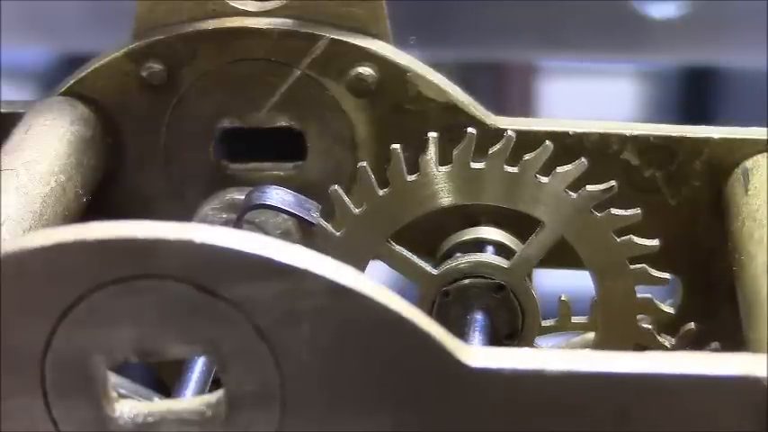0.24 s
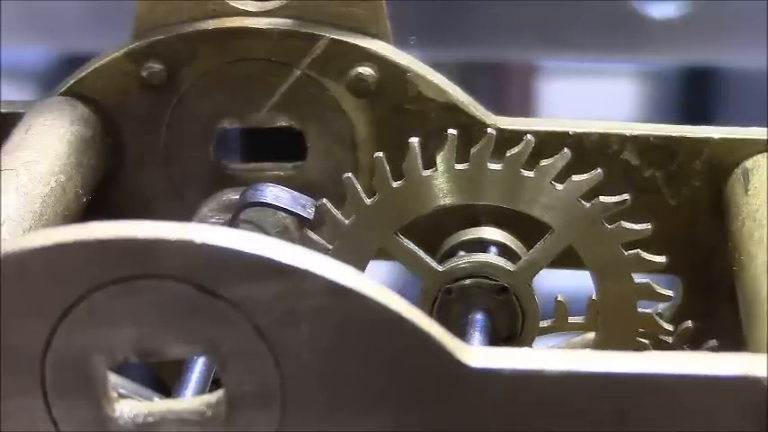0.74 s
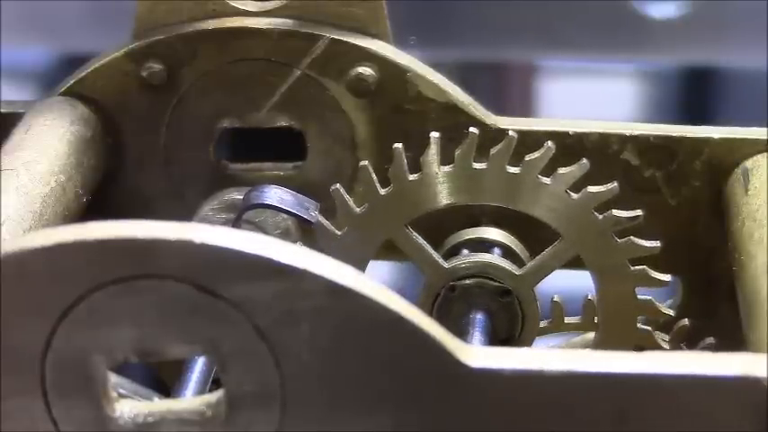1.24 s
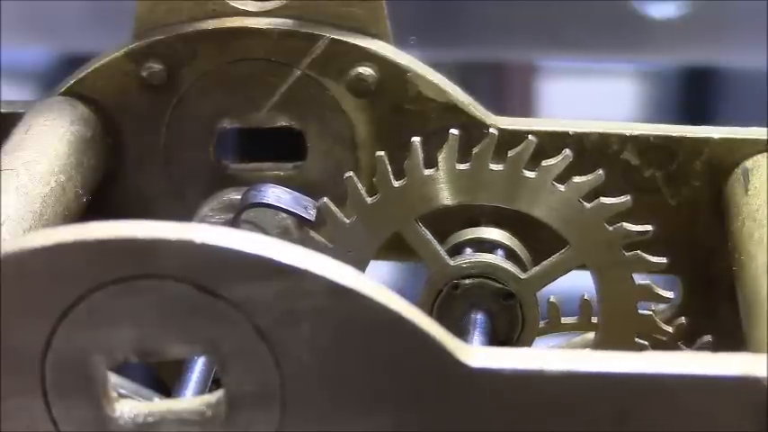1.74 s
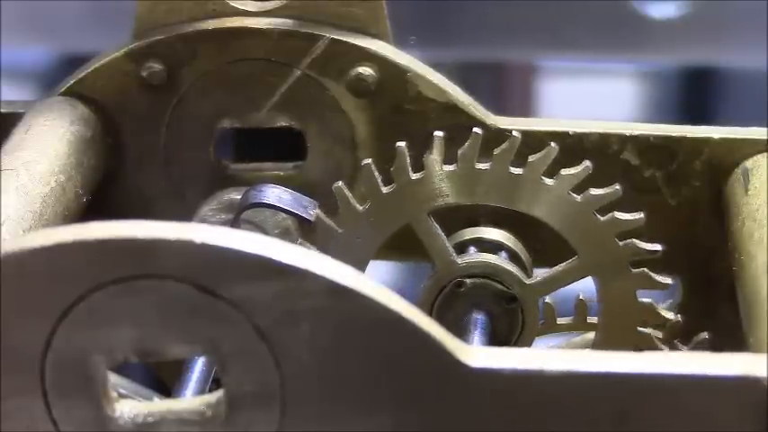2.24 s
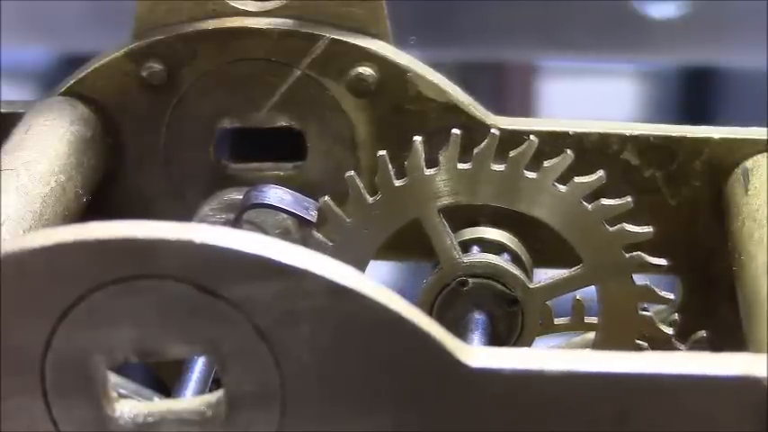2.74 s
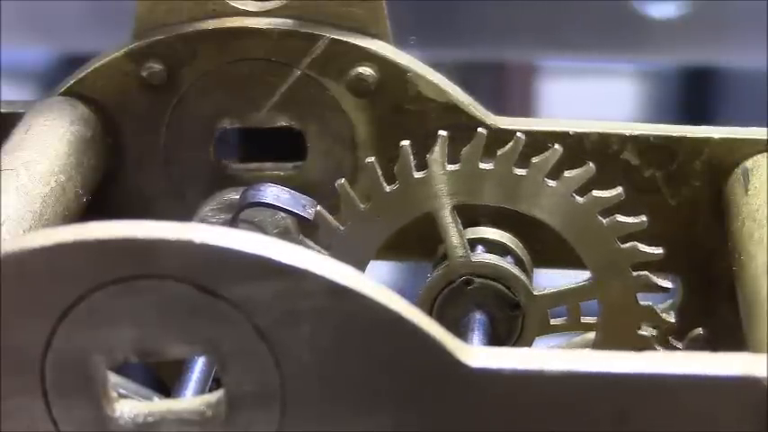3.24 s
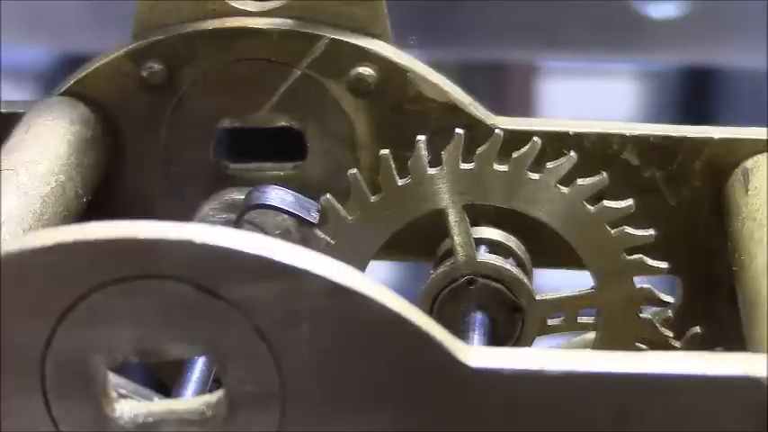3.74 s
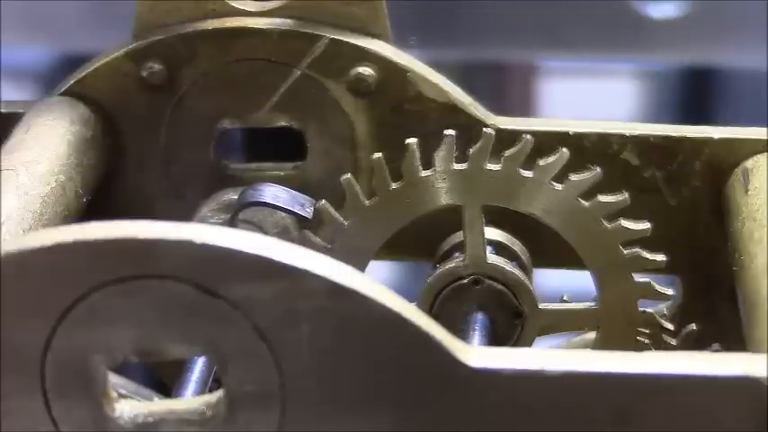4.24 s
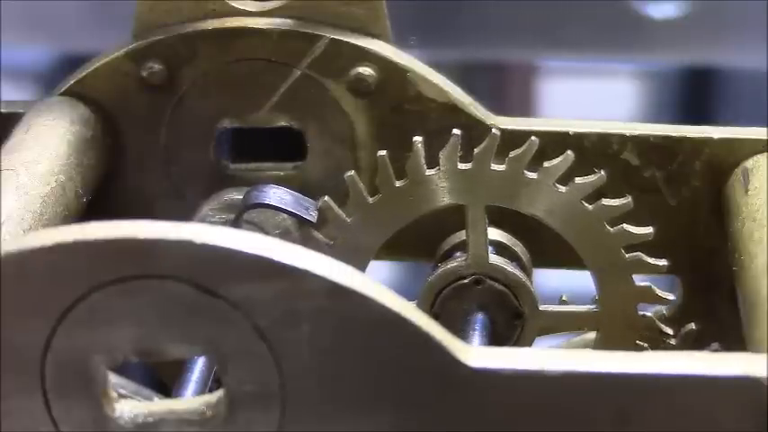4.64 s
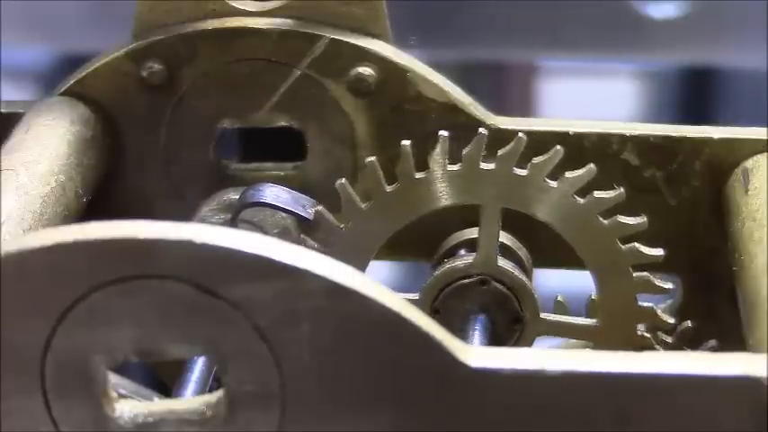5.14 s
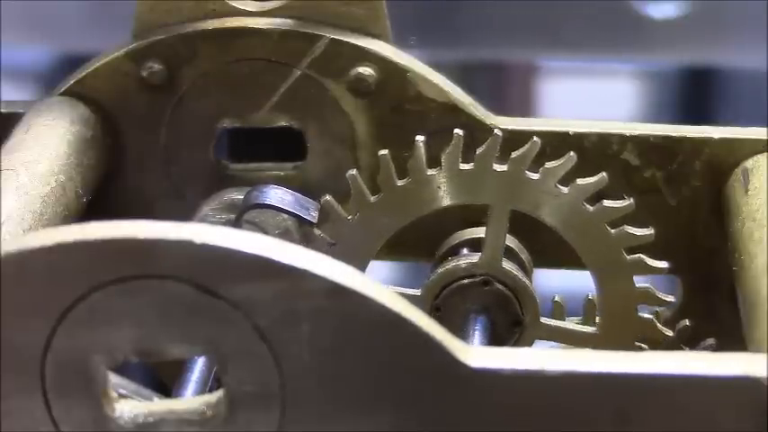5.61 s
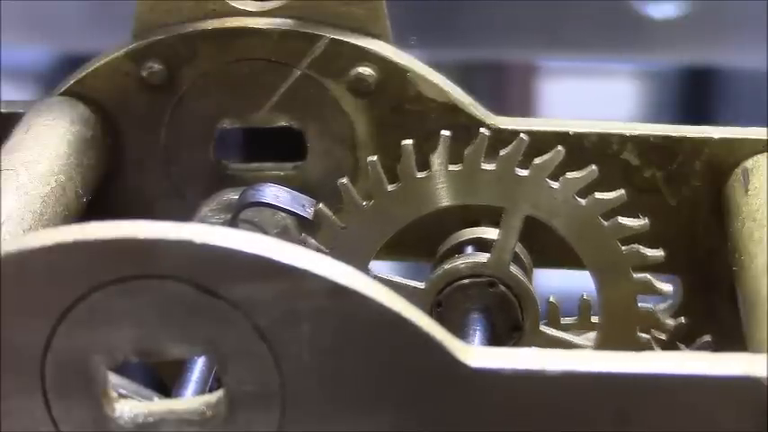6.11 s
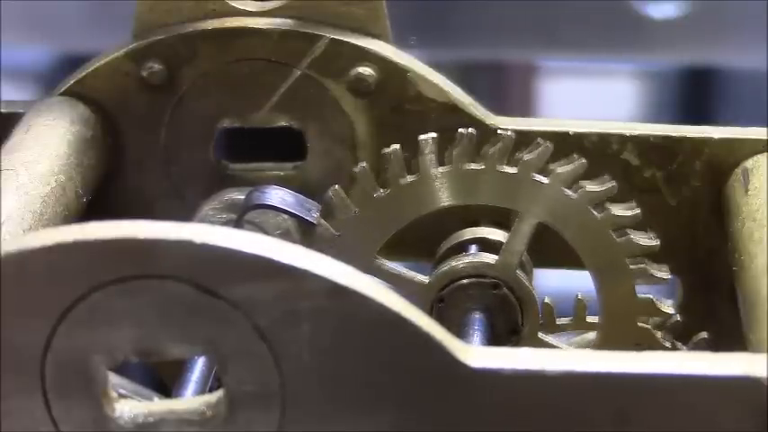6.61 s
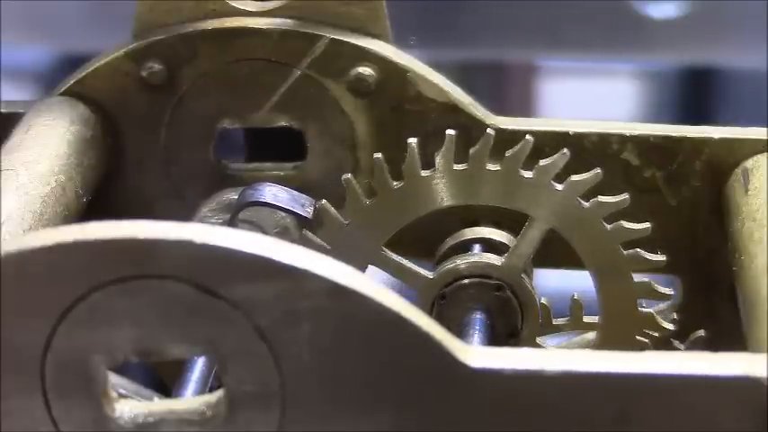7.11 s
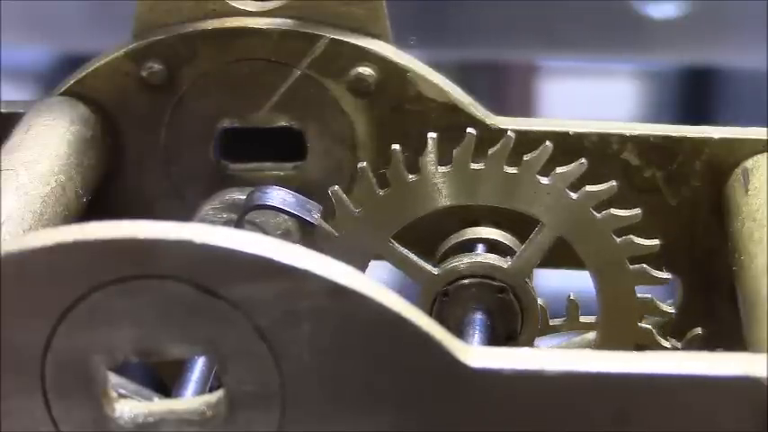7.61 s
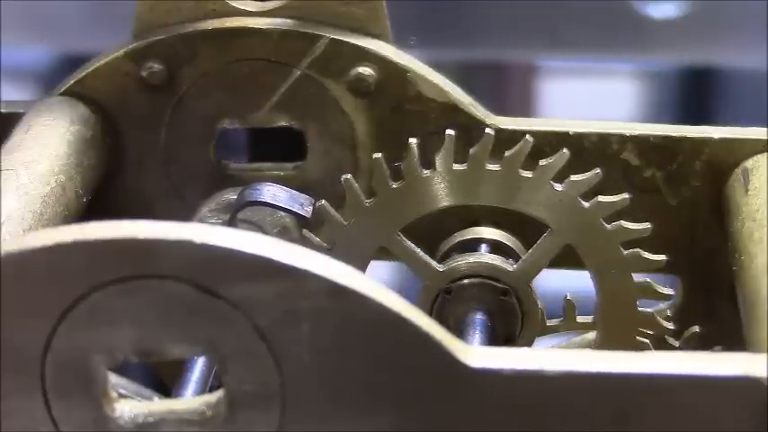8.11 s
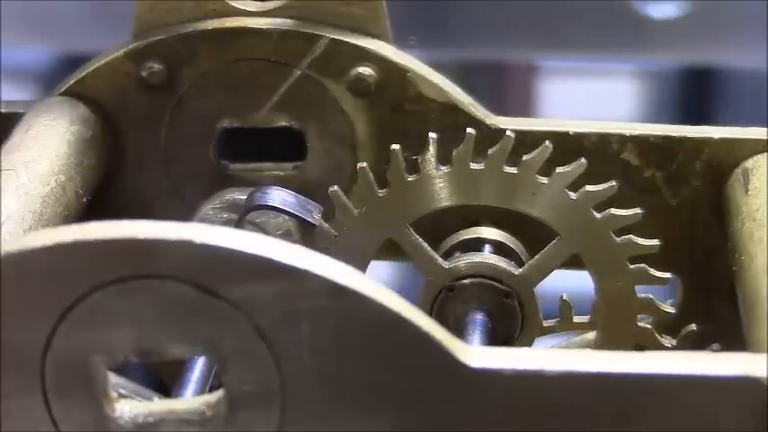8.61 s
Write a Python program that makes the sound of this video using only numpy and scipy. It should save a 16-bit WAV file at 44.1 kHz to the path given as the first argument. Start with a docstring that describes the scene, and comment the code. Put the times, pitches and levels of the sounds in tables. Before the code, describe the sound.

Close, steady clock ticking indoors: ringing metallic tock, then thin bright tick, with tiny scrapes between beats and very faint hum underneath.

```python
"""A full brass tock, then a thin tick: an open pendulum clock movement, close to a camera's two microphone ports.
Escape-wheel teeth land in turn on two pallets, bounce and rub; each blow rings decaying modes and noise bursts.
Far off in the room a second clock ticks as smeared noise, a bright and a dull beat in turn.
Under it lie a tiny fast ticking of dull noise puffs, mains hum of unsteady sines and a hiss of shaped noise."""
import sys
import numpy as np
from scipy import signal
from scipy.fft import rfft, irfft, next_fast_len
from scipy.io import wavfile
from scipy.ndimage import uniform_filter1d, map_coordinates

SR = 44100
rng = np.random.default_rng(int(sys.argv[2]) if len(sys.argv) > 2 else 0)


def file_out(sig):
    """Save sig as 16-bit WAV at sys.argv[1]."""
    # one column per channel
    cols = np.atleast_2d(sig).T
    # limit, then scale
    lim = np.clip(cols, -1, 1)
    pcm = np.round(lim * 32767).astype(np.int16)
    wavfile.write(sys.argv[1], SR, pcm)


N = 390724
LEAD = 441  # samples kept ahead of time zero, for sounds that start early


def amp(db):
    """Level in dB to a linear factor."""
    return 10 ** (np.asarray(db) / 20)


def unit(x):
    """Scales x to an RMS of one."""
    return x / np.sqrt(np.mean(x ** 2) + 1e-20)


def along(points, hz):
    """Reads a curve of (f/Hz, value) points on a log frequency axis."""
    f, v = np.transpose(points)
    return np.interp(np.log(hz + 1), np.log(f + 1), v)


def wobble(rate):
    """A smooth random curve, rate knots a second."""
    knots = rng.standard_normal(int(N * rate / SR) + 4)
    return map_coordinates(knots, [np.arange(N) * rate / SR])


def filtered(x, response):
    """Multiplies the spectrum of x by a response of frequency."""
    n = x.shape[-1]
    m = next_fast_len(n + 8192)
    return irfft(rfft(x, m) * response(np.fft.rfftfreq(m, 1 / SR)), m)[..., :n]


def add(track, s, sound):
    """Lays a sound at s seconds into a track that begins LEAD samples early."""
    part = track[max(round(s * SR) + LEAD, 0):][:len(sound)]
    part += sound[:len(part)]


def burst(spectrum, t60, rise):
    """A puff of coloured noise: many small modes dying together; t60 and rise in s."""
    t = np.arange(SR // 5) / SR
    white = rng.standard_normal(len(t))
    noise = unit(filtered(white, lambda hz: amp(along(spectrum, hz))))
    return noise * amp(-60 * t / t60) * (1 - np.exp(-t / rise)) ** 3


# hiss spectrum: (f/Hz, level per Hz/dB)
HISS_SPECTRUM = [(20, -17), (49, -19.5), (135, -3.5), (350, -0.5), (950, -6), (1100, -10.5), (2600, -14.5),
                 (4000, -18), (5000, -20.5), (7000, -21.5), (7400, -22), (12400, -28.5), (14200, -33),
                 (15700, -35)]
# narrow bands that stand out of the hiss: (f/Hz, width/Hz, level/dB)
HISS_BANDS = [(1516, 240, 7), (6980, 410, 5), (5580, 300, 3), (13200, 250, 5), (13450, 160, 9),
              (13750, 150, 7)]
# left-right likeness of the hiss: (f/Hz, correlation from 0 to 1)
HISS_LIKENESS = [(50, 0.5), (120, 0.54), (1000, 0.67), (3000, 0.69), (12000, 0.87)]
HISS_DB = -58.5


def hiss():
    """Room air and camera noise: the ports share a mid noise and take a side noise in opposite sign."""
    def level_db(f):
        bands = sum(db * np.exp(-(2 * (f - hz) / width) ** 2) for hz, width, db in HISS_BANDS)
        return along(HISS_SPECTRUM, f) + bands

    def mid_and_side(hz):
        turn = np.arccos(np.clip(along(HISS_LIKENESS, hz), -1, 1)) / 2
        return amp(level_db(hz)) * np.array([np.cos(turn), np.sin(turn)])

    mid, side = filtered(rng.standard_normal((2, N)), mid_and_side)
    air = unit(np.array([mid + side, mid - side]))
    low = filtered(air, lambda hz: 1 / (1 + (hz / 450) ** 4))
    high = air - low
    # the low murmur of the room wanders more
    return amp(HISS_DB) * (amp(0.33 * wobble(2.95)) * high + amp(0.64 * wobble(1.49)) * low)


# mains hum partials: (f/Hz, mean RMS level/dB)
HUM_PARTIALS = [(118.4, -83.5), (360.7, -72), (597.5, -70.5), (839.8, -95)]


def hum():
    """Partials near multiples of the mains buzz, slightly unsteady in level and phase."""
    t = np.arange(N) / SR
    out = np.zeros(N)
    for hz, db in HUM_PARTIALS:
        level = np.sqrt(2) * amp(db + 0.77 * wobble(1.33))
        out += level * np.sin(2 * np.pi * hz * t + 0.15 * wobble(4.0))
    return out


# spectrum of the faint fast ticks: (f/Hz, level per Hz/dB)
TICKER_TONE = [(1200, -21), (1800, -7), (2050, -1.5), (2500, -9), (3500, -19), (5000, -51)]
TICKER_FIRST_S, TICKER_PERIOD_S = .0475, .066733


def ticker():
    """Fifteen tiny dull noise ticks a second, perhaps from inside the camera, slightly uneven in level."""
    out = np.zeros(N + LEAD)
    for s in np.arange(TICKER_FIRST_S, N / SR, TICKER_PERIOD_S):
        level = amp(-62.5 + rng.normal(0, 2.0))
        add(out, s, level * burst(TICKER_TONE, t60=0.075, rise=0.00041))
    return out[LEAD:]


# treble of the far clock's beats: (f/Hz, level per Hz/dB)
FAR_TICK = [(4000, -9), (5200, -3), (6100, 0.5), (7300, -11), (10000, -18.5), (14000, -42)]
# body of the far clock's beats: (f/Hz, level per Hz/dB)
FAR_BODY = [(900, -6), (1600, 3.5), (2300, -1), (2800, 5.5), (3500, -11), (4300, 2), (5000, -29),
            (6000, -40)]
FAR_FIRST_S, FAR_PERIOD_S, FAR_OFFBEAT_S = -.061, .9191, .552
FAR_DB, FAR_BODY_DB = (-56, -66.5), (-1.5, 9.5)  # bright beat, dull beat; body against treble


def far_clock():
    """Far off in the room, mostly reverberation arrives: a smear, partly different at each port."""
    def smear(body_db):
        treble = burst(FAR_TICK, t60=0.17, rise=0.00083)
        return treble + amp(body_db) * burst(FAR_BODY, t60=0.15, rise=0.00035)

    out = np.zeros((2, N + LEAD))
    for start in np.arange(FAR_FIRST_S, N / SR, FAR_PERIOD_S):
        for s, db, body_db in zip((start, start + FAR_OFFBEAT_S), FAR_DB, FAR_BODY_DB):
            if s <= 0:
                continue
            shared = smear(body_db)
            for port in out:
                add(port, s, amp(db) * (shared + 0.38 * smear(body_db)))
    return out[:, LEAD:]


# reverberation of the room: (f/Hz, t60/s)
ROOM_DECAY = [(300, 0.59), (2000, 0.33), (10000, 0.31)]


def room(x):
    """Noise reverberation, separate at each port; each frequency dies at its own speed."""
    hz, t, z = signal.stft(rng.standard_normal((2, SR // 3)), SR, nperseg=256)
    decay = amp(-60 * t / along(ROOM_DECAY, hz)[:, None])
    tail = signal.istft(z * decay, SR, nperseg=256)[1]
    delayed = np.pad(x, (200, 0))[None]  # samples before the room answers
    return signal.fftconvolve(delayed, tail / np.linalg.norm(tail[0]), axes=1)[:, :N]


# modes of plates, wheel and case: (f/Hz, t60/s, level from the tock pallet/dB, level from the tick pallet/dB)
MOVEMENT_MODES = [(388, 0.052, -10.5, -8), (472.4, 0.086, 0, -10.5), (574.5, 0.17, -8.5, -35.5),
                  (697.7, 0.12, 6.5, -11), (936, 0.066, -8.5, -14), (1258, 0.039, -3, -4.5),
                  (1358, 0.2, -14, -31.5), (1551.3, 0.092, -9, -10.5), (1708, 0.042, -3, -5.5),
                  (1847, 0.11, -17, -15), (1959, 0.05, -13.5, -7.5), (2088, 0.035, -28.5, -40),
                  (2173, 0.15, -24, -41), (2293, 0.082, -16.5, -21), (2455, 0.036, -4.5, -13.5),
                  (2846, 0.065, -11.5, -9), (3067, 0.033, -8, -1), (3277, 0.021, -0.5, -11.5),
                  (3462, 0.028, -13, 1.5), (3729, 0.0099, 0, 6.5), (4245, 0.072, -48, -20),
                  (4880, 0.035, -23, -31), (5240, 0.17, -39.5, -29.5), (5220, 0.041, -25, -13),
                  (5570, 0.017, -22.5, -17), (5900, 0.015, -30, -35), (6854, 0.041, -23, -15.5),
                  (7120, 0.012, -41, -4.5), (7700, 0.08, -44, -19), (7827, 0.031, -26, -16.5)]


def ring(pallet, scatter_db, case_db=0, tilt_db=0):
    """The movement's modes after one blow on a pallet; the heavy case, below 1 kHz, is slow to get going."""
    hz, t60, *levels = np.transpose(MOVEMENT_MODES)[:, :, None]
    t = np.arange(SR // 5) / SR
    db = levels[pallet] + case_db * (hz < 1000)
    db = db + tilt_db * np.log2(hz / 2000)  # tilt in dB per octave
    db = db + scatter_db * rng.standard_normal(hz.shape)
    rise = np.where(hz < 1000, .008, 2.65 / hz)
    sides = (-1) ** np.arange(len(hz))[:, None]  # neighbouring modes start in opposite directions
    # each mode's pitch is slightly rough: a smoothed random walk of phase
    drift = 0.0011 * np.sqrt(hz) * np.cumsum(rng.standard_normal((len(hz), len(t))), axis=1)
    drift = uniform_filter1d(drift, size=60, axis=1)
    tones = np.sin(2 * np.pi * hz * t + drift)
    envelope = amp(db - 60 * t / t60) * (1 - np.exp(-t / rise)) ** 2
    return np.sum(sides * envelope * tones, axis=0)


# a tooth catches and scrapes on the pallet face: (t/s, level/dB, decay time/s)
SLIPS = [(0.622, -52, 0.0046), (1.343, -55, .007), (1.834, -50, 0.0089), (1.849, -40.5, 0.014),
         (1.883, -42, 0.0033), (2.232, -50.5, 0.0017), (2.631, -49.5, 0.017), (2.84, -45, 0.0053),
         (3.117, -51, .011), (3.59, -50, 0.0018), (3.7, -51, .008), (3.785, -40, .005),
         (4.102, -50.5, 0.011), (4.646, -60, .006), (4.731, -39, 0.0048), (5.046, -54, 0.0048),
         (5.118, -56, .007), (5.618, -52, .004), (5.648, -44, 0.019), (6.018, -47, .004),
         (6.074, -55, .006), (6.521, -52, 0.0042), (6.615, -29.5, .004), (7.036, -46.5, 0.011),
         (7.507, -47.5, .004), (7.575, -42.5, 0.0061), (7.907, -56, .005), (8.389, -67, 0.0055),
         (8.526, -41, .004), (8.845, -50.5, .005)]


def scrapes():
    """Each catch and its decaying scrape drive the movement; soft contact dulls the ring."""
    out = np.zeros(N + LEAD)
    t = np.arange(SR // 10) / SR
    for s, db, length in SLIPS:
        force = rng.standard_normal(len(t)) * np.exp(-t / length)
        force[0] = 6  # the catch itself
        answer = ring(1, scatter_db=4.5, case_db=-24, tilt_db=-8.5)
        add(out, s, amp(db) * signal.fftconvolve(force / np.linalg.norm(force), answer))
    return out[LEAD:]


# metal on metal: (f/Hz, level per Hz/dB)
CRACK = [(1020, -48), (1250, 9.5), (2600, -5), (3600, 6.5), (4400, -18), (6000, -12), (7500, -13),
         (8300, -62), (9300, -14), (10700, -40), (11600, -34), (12500, -35), (13550, -40), (14400, -46),
         (15800, -62)]
RUB_LIGHT_DB, RUB_FIRM_DB = -72.5, np.array([-58.5, -60.5])  # firm: before a tock, before a tick
RUB_BUILD_S, NEXT_TICK_S = 0.32, 8.99  # time over which pressure builds; landing due after the end


def rubbing():
    """Grainy, uneven sliding: the tooth rubs lightly after a landing and presses harder toward the next."""
    grit = rng.standard_normal(N) * amp(2.05 * wobble(27) + 2.8 * wobble(200))
    body = unit(ring(1, 0, case_db=-42.0, tilt_db=-3.5))
    body = body + amp(10) * burst(CRACK, t60=0.018, rise=0.00027)
    slide = unit(signal.fftconvolve(grit, body)[:N])
    now = np.arange(N) / SR
    landings = np.array([s for s, db in BEATS] + [NEXT_TICK_S])
    coming = np.searchsorted(landings, now)
    press = np.clip(1 - (landings[coming] - now) / RUB_BUILD_S, 0, 1)
    return amp(RUB_LIGHT_DB + press * (RUB_FIRM_DB[coming % 2] - RUB_LIGHT_DB)) * slide


# landings, tock and tick in turn: (t/s, level/dB)
BEATS = [(-0.0004, -21.5), (0.4481, -23), (0.943, -21), (1.4026, -23), (1.8973, -21), (2.3563, -22.5),
         (2.855, -21), (3.3117, -23.5), (3.7983, -20), (4.2564, -23.5), (4.7434, -21.5), (5.198, -22.5),
         (5.6799, -21.5), (6.147, -23), (6.6296, -20.5), (7.1017, -24), (7.5879, -20.5), (8.0505, -22),
         (8.5357, -21)]
# rebounds of the tooth after a landing: (delay t/s, level against the landing/dB)
TOCK_BOUNCES = [(.0022, -0.5), (.0051, -6), (.0078, 0.5), (.0097, -3.5), (.0134, -41)]
TICK_BOUNCES = [(.0019, -6.5), (.0064, -8), (.0092, -13)]
# the case as a whole: (f/Hz, level per Hz/dB)
THUD = [(200, -32), (350, 8), (520, 12.5), (750, 11), (1000, -25.5), (1300, -52)]
# the very first instant of contact: (f/Hz, level per Hz/dB)
SNAP = [(2500, -12), (7400, -16.5), (9500, -6), (13000, -3), (15000, -45)]
# levels in dB from the tock pallet and the tick pallet
CASE_DB, CRACK_DB, SNAP_DB = (-3, -3), (-4.5, -6.5), (-25.5, -19)
THUD_DB, RATTLE_DB = (-14.5, -16), (-14, -14)
GRAZE = (-0.0015, -20)  # first touch of tooth and pallet: (delay t/s, level/dB)


def escapement():
    """Each landing and its bounces ring the movement; only the landing thuds the case and rattles the train."""
    out = np.zeros((2, N + LEAD))
    for k, (s, db) in enumerate(BEATS):
        pallet = k % 2
        heavy = ring(pallet, scatter_db=0.5, case_db=CASE_DB[pallet])
        light = ring(pallet, scatter_db=0.84, case_db=-20.5)
        thud = amp(THUD_DB[pallet]) * burst(THUD, t60=0.085, rise=0.0017)
        rattle = amp(RATTLE_DB[pallet]) * burst(CRACK, t60=0.14, rise=0.002)
        for port in out:
            add(port, s, amp(db) * (thud + rattle))
        contacts = [(0, 0), GRAZE, *(TOCK_BOUNCES, TICK_BOUNCES)[pallet]]
        for j, (delay, contact_db) in enumerate(contacts):
            blow = light if j else heavy
            blow = blow + amp(CRACK_DB[pallet]) * burst(CRACK, t60=0.033, rise=0.0001)
            blow = blow + amp(SNAP_DB[pallet]) * burst(SNAP, t60=0.0068, rise=.00008)
            at = s + delay * (1 + .006 * rng.standard_normal())
            gain = amp(db + contact_db + rng.normal(0, 0.95))
            for port in out:  # each port faces other parts of the plates
                own_crack = amp(-8.5) * burst(CRACK, t60=0.012, rise=0.0002)
                own_snap = amp(SNAP_DB[pallet] - 13) * burst(SNAP, t60=0.0096, rise=.0001)
                add(port, at, gain * (blow + own_crack + own_snap))
    return out[:, LEAD:]


# how far the left port favours the movement over the right: (f/Hz, level/dB)
LEFT_FAVOUR = [(600, 0), (2000, .7), (4000, 1.1), (8000, -.2)]


def at_the_ports(movement):
    """Close sound at the two ports: a slight left-right tilt, and no deep bass from such small plates."""
    def response(hz):
        balance = amp(along(LEFT_FAVOUR, hz) / 2 * np.array([[1], [-1]]))
        return balance * hz ** 4 / (hz ** 4 + 250 ** 4)

    return filtered(movement, response)


def scene():
    """The close movement and its reverberation over the far clock, ticker, hum and hiss."""
    background = hiss() + hum() + ticker() + far_clock()
    near = at_the_ports(scrapes() + rubbing() + escapement())
    return background + amp(-25.5) * room(near.mean(axis=0)) + near


TOP_HZ = 15760


def record(dry):
    """Nothing sounds above TOP_HZ."""
    return filtered(dry, lambda hz: hz < TOP_HZ)


dry = scene()
out = record(dry)
file_out(out)
```